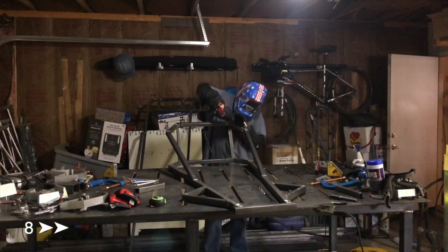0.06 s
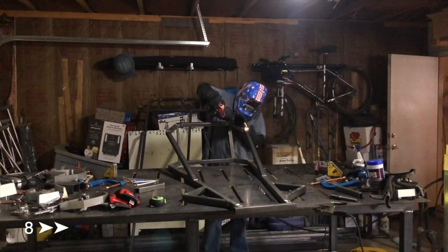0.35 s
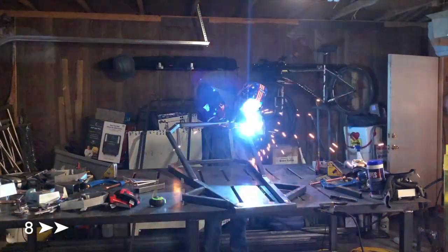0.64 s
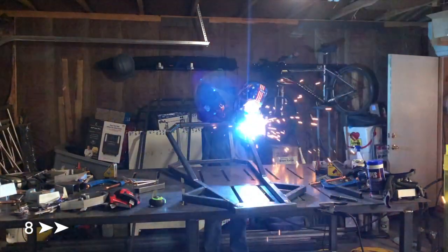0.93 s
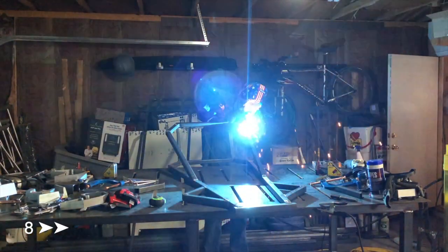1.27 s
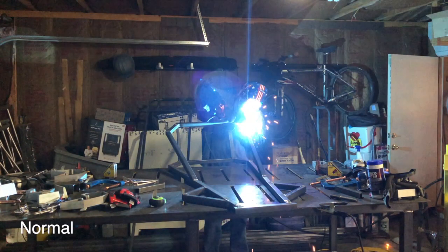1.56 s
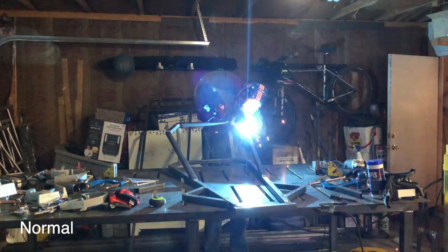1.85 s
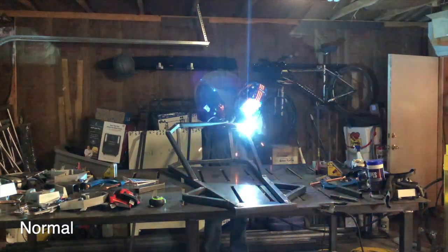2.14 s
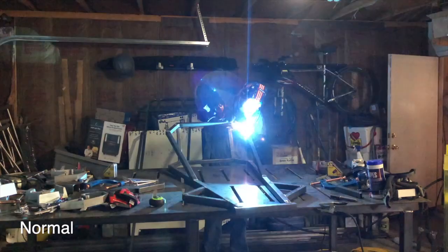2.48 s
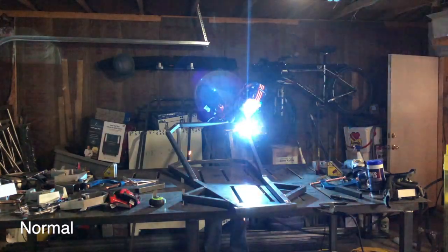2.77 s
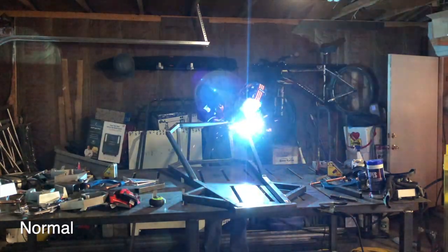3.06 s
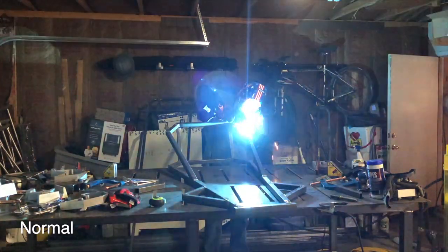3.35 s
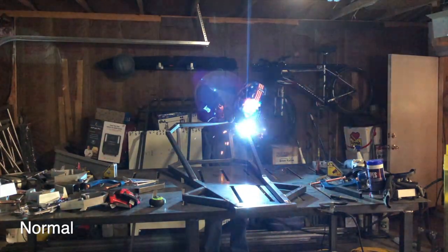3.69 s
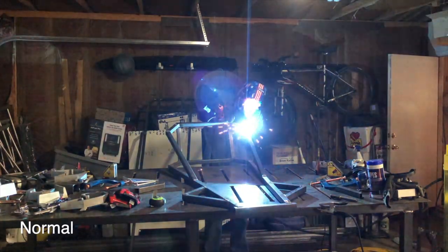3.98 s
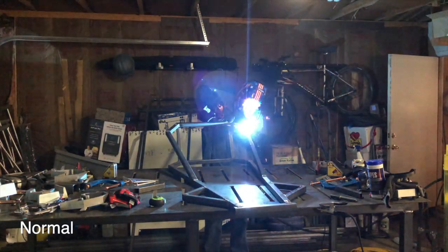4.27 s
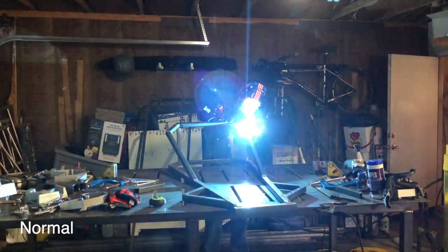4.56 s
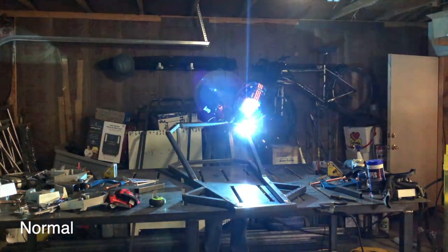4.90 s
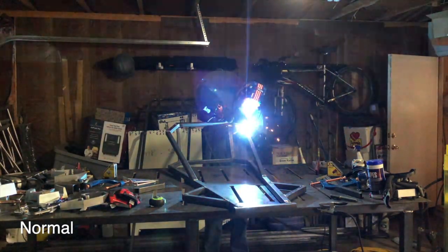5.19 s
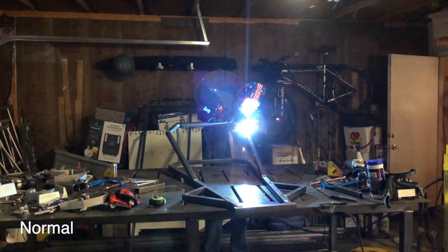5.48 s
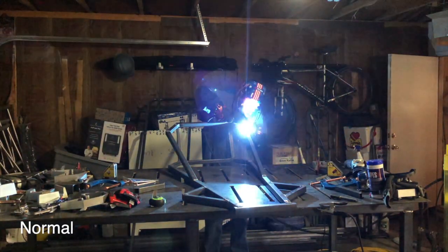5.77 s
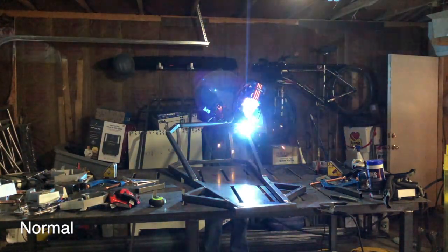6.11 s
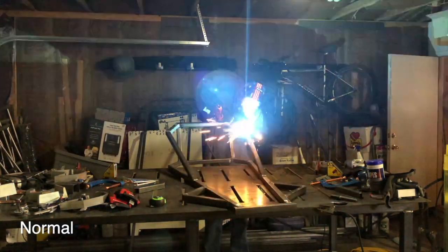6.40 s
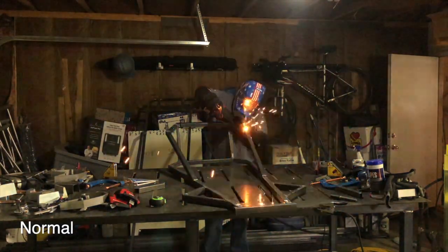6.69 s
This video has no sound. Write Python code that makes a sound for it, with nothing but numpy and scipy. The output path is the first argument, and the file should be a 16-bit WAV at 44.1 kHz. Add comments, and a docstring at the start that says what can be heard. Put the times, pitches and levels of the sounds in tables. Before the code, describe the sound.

A fan hums faintly in a wooden garage. A few metres from the microphone, a wire-feed arc welder strikes on a steel frame with loud, hissing sprays of sparks. The arc crackles rapidly over a sizzle and a light roar, popping and stumbling at times. It then grows quieter and settles into an even frying, and stops with a last spray of sparks and small pops. The fan runs throughout.

```python
"""A fan hums in a wooden garage; then, a few metres away, a wire-feed arc welder strikes on a steel frame.
Sparks spray, gas hisses, and the wire shorts into the pool over a hundred times a second, each time
with a snap, over the sizzle and roar of the arc. The arc pops and stumbles, settles to an even frying,
and ends in a last spray of sparks. The fan runs throughout."""
import sys
import numpy as np
from scipy import signal
from scipy.fft import rfft, irfft
from scipy.io import wavfile
from scipy.ndimage import uniform_filter1d, map_coordinates

SR = 44100
rng = np.random.default_rng(int(sys.argv[2]) if len(sys.argv) > 2 else 0)


def pcm_store(signal):
    """Save signal as 16-bit PCM."""
    levels = np.round(np.clip(np.atleast_2d(signal), -1, 1) * 32767)
    wavfile.write(sys.argv[1], SR, levels.astype(np.int16).T)


N = 297234
TIME = np.arange(N) / SR


def amp(db):
    """Decibels to gain."""
    return 10 ** (np.asarray(db) / 20)


def unit_rms(x):
    """Scales to rms 1."""
    return x / np.sqrt(np.mean(x ** 2) + 1e-20)


def steady(x):
    """Holds rms at 1 over a sliding half second."""
    return x / np.sqrt(uniform_filter1d(x ** 2, SR // 2))


def at_hz(table, hz):
    """Table lookup on a log-frequency axis."""
    table_hz, value = np.transpose(table)
    return np.interp(np.log(hz + 1), np.log(table_hz), value)


def follow(table):
    """Each value column of a time table, per sample."""
    times_s, *columns = np.transpose(table)
    return [np.interp(TIME, times_s, column) for column in columns]


def bump(at_s, half_width_s):
    """Gaussian swell, height 1."""
    return np.exp(-((TIME - at_s) / half_width_s) ** 2)


def gust(start_s, hold_s, db, rise_s=.0051, fall_s=.0029):
    """Burst envelope: rise, hold, decay."""
    rise = np.clip((TIME - start_s) / rise_s, 0, 1)
    return amp(db) * rise * np.exp(-np.maximum(TIME - start_s - hold_s, 0) / fall_s)


def drift(hz):
    """Random wander up to about hz, rms 1."""
    lowpass = np.exp(-(np.fft.rfftfreq(N, 1 / SR) / hz) ** 2)
    return unit_rms(irfft(rfft(rng.standard_normal(N)) * lowpass, N))


def through(x, response):
    """Convolution, cut to N."""
    return signal.oaconvolve(x, response)[:N]


def delayed(x, ms):
    """Variable delay."""
    return map_coordinates(x, [np.arange(N) - ms * SR / 1000], order=3)


def band(x, low_hz, high_hz):
    """Soft band-pass, rms 1."""
    return unit_rms(signal.sosfilt(signal.butter(2, [low_hz, high_hz], "band", fs=SR, output="sos"), x))


def ring(x, modes):
    """Sum of resonances, each at its own rms level."""
    return sum(amp(db) * unit_rms(signal.lfilter(*signal.iirpeak(hz, hz / width_hz, SR), x))
               for hz, width_hz, db in modes)


def click(spectrum, size=4096):
    """Minimum-phase click with this spectrum, peak 1."""
    log_gain = np.log(amp(at_hz(spectrum, abs(np.fft.fftfreq(size, 1 / SR)))))
    wave = np.fft.ifft(np.exp(np.conj(signal.hilbert(log_gain)))).real[:size // 2]
    return wave / abs(wave).max()


# fan hum (time [s], level [dB])
HUM_LEVEL = [(.17, -57), (.22, -64.5), (.55, -57.5), (4.6, -57), (5.7, -61)]
# cooling air (frequency [Hz], relative density [dB])
AIR_SPECTRUM = [(25, -44), (60, -8.5), (120, -10), (190, 9.5), (320, 0.5), (650, -4.5), (900, -4),
                (1350, -10.5), (2000, -6), (3300, -9), (6000, -17), (12000, -39)]
# housing resonances (frequency [Hz], width [Hz], level [dB])
HOUSING_MODES = [(648, 41, -71), (1260, 200, -68.5)]

def fan(start_hz=218.5, end_hz=209.2, settle_s=.442, waver_db=.76, dip_db=-20, air_db=-68.5):
    """A wavering hum settles in pitch and dips briefly twice, over the rush of cooling air."""
    hz = end_hz + (start_hz - end_hz) * np.exp(-TIME / settle_s)
    dips = sum(bump(at_s, half_width_s=.013) for at_s in (.07, .658))
    level_db = follow(HUM_LEVEL)[0] + dip_db * dips + waver_db * drift(14)
    hum = np.sqrt(2) * amp(level_db) * np.sin(2 * np.pi * np.cumsum(hz) / SR)
    air = unit_rms(through(rng.standard_normal(N), click(AIR_SPECTRUM)))
    return hum + amp(air_db) * air + ring(air, HOUSING_MODES)


# sprays of molten metal (time [s], hold [s], level [dB], lower edge [Hz])
SPARK_SPRAYS = [(0.374, 0.028, -46, 1400), (0.424, 0.029, -32.5, 2500), (0.488, 0.02, -23.5, 1970),
                (0.56, 0.021, -29, 1200), (0.664, 0.027, -28, 1000), (0.828, 0.084, -28, 1000),
                (0.93, 0.03, -24.5, 1200), (6.454, 0.021, -27, 3200), (6.525, 0.011, -39, 3600),
                (6.581, 0.018, -40, 4260), (6.717, 0.0073, -42, 3600)]
# spark hiss (frequency [Hz], relative density [dB])
SPRAY_SPECTRUM = [(530, -46), (900, -51), (1120, -9.5), (1420, -7), (1690, -6), (4400, 1), (6200, 6),
                  (7500, -0.5), (11800, 2), (15500, 0)]

def sprays(room, grain_db=3):
    """Showers of sparks hiss out of the pool; finer ones have less body."""
    fizz = through(rng.standard_normal(N) * amp(grain_db * drift(1200)), click(SPRAY_SPECTRUM))
    showers = sum(band(fizz, low_hz, 15000) * gust(*burst) for *burst, low_hz in SPARK_SPRAYS)
    return in_room(showers, room) / np.linalg.norm(room[:2])


# steel frame resonances (frequency [Hz], width [Hz], relative level [dB])
FRAME_MODES = [(468, 26, -3), (690, 50, -2), (791, 20, -6), (900, 55, 1), (1410, 24, -4), (1625, 20, -5),
               (1790, 40, -6), (1841, 10, -2), (2394, 40, -6), (2575, 40, -7)]

def feed(start_s=.378, whirr_db=-65, gas_db=-59, rise_s=.0039):
    """Trigger pulled: wire rubs through the torch, shielding gas hisses."""
    noise = rng.standard_normal(N)
    whirr = unit_rms(ring(noise, FRAME_MODES))
    gas = ring(ring(noise, [(3700, 4500, 0)]), [(5470, 21000, 0)])
    return (amp(whirr_db) * whirr + amp(gas_db) * gas) * np.clip((TIME - start_s) / rise_s, 0, 1)


ARC_ON_S, ARC_OFF_S = .417, 6.36
# the arc quietens as it settles into the pool (time [s], level [dB])
ARC_LEVEL = [(.42, -42.5), (.6, -33), (.76, -31), (1.1, -33), (1.98, -34.5), (2.25, -38), (2.55, -35),
             (2.8, -35), (3.22, -44.5), (3.8, -44.5), (4.35, -49), (4.75, -46.5), (5.35, -53),
             (5.95, -50.5), (6.38, -56)]
# brief swings, mostly harder frying (time [s], half width [s], change [dB])
ARC_SURGES = [(1.95, 0.044, 3), (3.51, 0.052, 4), (3.73, 0.075, 5), (3.945, 0.02, 3.5), (4.135, 0.038, 1.5),
              (4.435, 0.023, 1.5), (4.825, 0.028, -1), (4.985, 0.028, 2.5), (5.767, 0.046, 5)]

def arc_db():
    """How hard the arc burns; drives crackle, brightness, roar and spits."""
    return follow(ARC_LEVEL)[0] + sum(db * bump(at_s, width_s) for at_s, width_s, db in ARC_SURGES)


def cold(warm_up_s=.19):
    """1 at the strike, 0 once the arc has taken hold."""
    return np.clip(1 - (TIME - ARC_ON_S) / warm_up_s, 0, 1)


def calm(below_db=-43, range_db=6):
    """0 while the arc crackles hard, 1 once it only fries."""
    return np.clip((below_db - arc_db()) / range_db, 0, 1)


# the wire stubs or loses the pool (start [s], end [s], relative level of relight pop [dB])
ARC_STALLS = [(.62, .6615, -8), (.755, .781, -8), (.797, .8395, -6), (.905, .9305, -9), (2.035, 2.15, -19),
              (2.215, 2.2363, -12), (2.252, 2.305, -20), (2.34, 2.356, -17), (2.372, 2.444, -30),
              (3.035, 3.0525, -16), (3.262, 3.378, -26), (3.45, 3.4695, -17), (3.887, 3.9095, -13)]

def burning(stall_db=-17, fade_s=.0043):
    """Arc gate: 1 while lit, ducked in a stall, 0 when off."""
    lit = np.clip(np.minimum(TIME - ARC_ON_S, ARC_OFF_S - TIME) / fade_s + 1, 0, 1)
    stalled = sum((TIME > start_s) & (TIME < end_s) for start_s, end_s, _ in ARC_STALLS)
    return lit * uniform_filter1d(amp(stall_db * stalled), size=64)


# wire shorting into the pool (time [s], mean rate [1/s])
SHORTING_RATE = [(1.35, 170), (2.4, 114)]

def shorts(count=1100, spread_db=2.3, cracks=5, burst_s=.0009):
    """Each drop melts, bridges and bursts in tiny cracks; a longer wait ends in a harder snap."""
    waits = .78 + rng.exponential(.22, count)  # in mean periods
    sizes = waits ** .4 * amp(spread_db * np.clip(rng.standard_normal(count), -2, 1.2))
    periods = np.cumsum(follow(SHORTING_RATE)[0]) / SR
    short_s = np.interp(np.cumsum(waits), periods, TIME, right=N / SR)
    crack_s = short_s[:, None] + rng.uniform(0, burst_s, (count, cracks))
    kicks = sizes[:, None] * (-.88) ** np.arange(cracks)
    return unit_rms(np.bincount((crack_s.ravel() * SR).astype(int), kicks.ravel(), N)[:N])


# weld pool (time [s], heat [0-1])
POOL_HEAT = [(1.5, 0), (3.1, 1)]
# snap on cold steel and on the hot pool (frequency [Hz], relative density [dB])
COLD_SPECTRUM = [(200, -58), (600, -22), (900, -19), (1200, -36), (1850, -11), (2400, -14.5), (2900, -11.5),
                 (3450, -6.5), (4300, -9), (6100, -2.5), (7600, -9), (9200, -4.5), (13000, -3.5),
                 (15600, -9)]
HOT_SPECTRUM = [(500, -57), (1400, -21), (2400, -10.5), (2950, -13), (3450, -2), (4300, -5), (6200, 1),
                (7700, -4), (9300, -0.5), (10900, -8.5), (11900, -5), (14000, -6), (15600, -8.5)]

def snap(kicks):
    """Kicks become snaps, thinner as the pool heats."""
    heat = follow(POOL_HEAT)[0]
    return (1 - heat) * through(kicks, click(COLD_SPECTRUM)) + heat * through(kicks, click(HOT_SPECTRUM))


def brightness_db(cold_db=-12, hot_db=7.5, knee_db=-45.5, slope=6, floor_db=-7):
    """Top octave: weak at the strike, strong on a hot pool, weak again on a calm arc."""
    calm_db = np.clip(slope * (arc_db() - knee_db), floor_db, 0)
    return cold_db * cold() + hot_db * follow(POOL_HEAT)[0] + calm_db


def crackle(room, body_db=1, top_db=-1, split_hz=10500, ripple_hz=120, flutter_db=1.5, calm_snap_db=-3):
    """Snaps over sizzle; as the arc calms, the snaps sink into a fine, even frying."""
    throb = 1 + .3 * np.cos(2 * np.pi * ripple_hz * TIME)  # rectified supply
    hiss = throb * rng.standard_normal(N) * amp(flutter_db * (1 - calm()) * drift(200))
    sizzle = snap(unit_rms(hiss))
    snaps = snap(shorts()) * amp(calm_snap_db * calm())
    low, high = (signal.butter(5, split_hz, kind, fs=SR, output="sos") for kind in ("low", "high"))
    body = weave(tube_echo(signal.sosfilt(low, snaps + .7 * sizzle)))
    top = glance(signal.sosfilt(high, snaps + .32 * sizzle))
    arc = amp(body_db) * steady(body) + amp(top_db + brightness_db()) * steady(top)
    return in_room(arc * amp(arc_db()) * burning(), room) / np.linalg.norm(room[:2])


def tube_echo(x):
    """The tube beside the seam throws each snap straight back."""
    return x + .2 * delayed(x, ms=.86)


# glove and helmet echoes (time [s], strength [0-1])
WEAVE_ECHOES = [(2.9, .1), (3.45, .28), (4.1, .28), (4.5, .08)]

def weave(x, delays_ms=(.5, .95, 1.4), swing=.14, rate_hz=3):
    """Echoes off glove and helmet swirl as the torch weaves."""
    strength = follow(WEAVE_ECHOES)[0]
    echoes = sum(delayed(x, ms * (1 + swing * drift(rate_hz))) for ms in delays_ms)
    return (x + strength * echoes) / np.sqrt(1 + len(delays_ms) * strength ** 2)


# echo off steel near the torch (time [s], delay [ms], strength [0-1])
STEEL_ECHO = [(2.9, .924, .3), (3.27, .893, .65), (3.6, .915, .45), (3.9, .932, .55), (4.22, .888, .55),
              (4.5, .92, .4), (4.8, .915, .5), (5.3, .9, .25), (5.7, .915, .35)]

def glance(x, sway_ms=.005):
    """The echo path moves with the welder's hand and sweeps a comb through the hiss."""
    ms, strength = follow(STEEL_ECHO)
    return x + strength * delayed(x, ms + sway_ms * drift(4))


# arc flare-ups (time [s], hold [s], relative level [dB], centre [Hz])
ARC_FLARES = [(0.571, 0.011, -49.5, 760), (0.666, 0.03, -49.5, 1040), (0.747, 0.0047, -45, 910),
              (0.833, 0.0404, -43, 840), (0.933, .007, -42.5, 950), (2.174, 0.0071, -45, 2000),
              (2.355, .01, -49, 1780), (2.452, .009, -40.5, 950), (3.517, 0.02, -52, 630)]

def flares(drive, knock_db=-1, log_half_width=.27):
    """Dull puffs as the arc flares up."""
    knock = amp(knock_db) * band(drive, 580, 2100)
    ratio = np.exp(log_half_width)
    return sum(unit_rms(band(drive, hz / ratio, hz * ratio) + knock) * gust(*burst)
               for *burst, hz in ARC_FLARES)


def roar(room, level_db=-59, knee_db=-46, slope=1.17, cold_db=-11, flutter_db=4, flare_db=2):
    """The fluttering arc column pumps the air and shakes the frame; it fades below the knee."""
    unrest = 1 - calm()
    drive = steady(rng.standard_normal(N) * amp(flutter_db * unrest * drift(250)) + unrest * shorts())
    steel = band(ring(drive, FRAME_MODES), 473, 4200)
    air = amp(-1) * band(drive, 163, 2700)
    rumble = amp(-23 - 8 * calm()) * band(band(drive, 95, 170), 95, 170)
    calm_db = slope * np.minimum(arc_db() - knee_db, 0)
    gain = amp(level_db + calm_db + cold_db * cold()) * np.sqrt(burning())
    column = (steel + air + rumble) * gain + amp(flare_db) * flares(drive)
    return in_room(column, room) / np.linalg.norm(room[:2])


def spits(max_per_s=3.6, over_arc_db=9, spread_db=2):
    """Random kicks for lesser pops, scaled to the arc; none once it is calm."""
    struck = rng.random(N) < max_per_s / SR * (1 - calm())
    return struck * burning() * amp(arc_db() + over_arc_db + spread_db * rng.standard_normal(N))


# the wire burns free (time [s], relative level [dB])
WIRE_POPS = [(0.533, -19), (0.563, -4.5), (.613, -6), (0.717, -15), (0.729, -21), (.789, -7), (.8355, -11),
             (0.8703, -12), (0.934, -6), (1.005, -9), (1.0495, -7.5), (1.2785, -8), (1.3115, -7.5),
             (1.387, -14.5), (1.488, -4), (1.8905, -9), (1.9282, -5), (2.045, -9), (2.0926, -8.5),
             (2.1705, -10.5), (2.271, -13), (2.3298, -12.5), (2.38, -8.5), (2.4538, -10.5), (2.727, -11),
             (2.7638, -7), (2.8947, -10.5), (2.9375, -10.5), (3.07, -10), (3.2806, -28), (3.3273, -22.5),
             (3.6957, -9), (3.963, -12.5), (4.1253, -18), (4.432, -22.5), (4.57, -19.5), (4.8108, -17.5),
             (4.818, -17.5), (4.988, -18.5), (5.155, -24.5), (6.39, -28.5), (6.445, -24.5), (6.522, -15),
             (6.584, -24), (6.6427, -23), (6.657, -21), (6.671, -25), (6.712, -23.5)]

def pops(room, pop_db=-3, spatter_db=.5, spatter_s=.0046, crack_db=-2, crack_s=.00025, edge_hz=8500):
    """A bridge of wire explodes: a hard crack, then a short fizz of spatter."""
    relights = [(end_s, db) for _, end_s, db in ARC_STALLS]
    at_s, db = np.transpose(WIRE_POPS + relights)
    kicks = np.bincount(np.round(at_s * SR).astype(int), amp(db + pop_db), N)[:N] + spits()
    t = TIME[:SR // 20]
    fade = np.exp(-t / spatter_s)
    spatter = amp(spatter_db) * rng.standard_normal(N) * through(kicks, fade / np.linalg.norm(fade))
    crack = amp(crack_db) * rng.choice([-1, 1], N) * through(kicks, np.exp(-t / crack_s))
    edge = signal.lfilter(*signal.butter(2, edge_hz, "high", fs=SR), crack)
    # the bright edge beams straight at the listener
    return glance(edge) + in_room(pop_body(kicks + spatter), room)


# pop (frequency [Hz], relative density [dB])
POP_SPECTRUM = [(200, -52), (2000, -14), (6000, 1), (8000, -1.5), (12000, 0), (15500, -6.5)]

def pop_body(kicks):
    """Kicks become pops, echoed by glove and helmet."""
    return weave(through(kicks, click(POP_SPECTRUM)))


# bench and wall echoes (delay [ms], level [dB])
WALL_ECHOES = [(3.8, -11), (8.7, -14), (10.9, -12), (15.4, -14)]
# garage decay (frequency [Hz], T60 [s])
GARAGE_T60 = [(500, 0.013), (3500, 0.27), (8000, 0.22), (15000, 0.13)]

def garage(tail_db=-1, clutter_db=-2, clutter_s=.0088, dull_hz=10000):
    """Three responses: direct sound with echoes and tail, then two scatter patterns off the clutter."""
    t = TIME[:SR // 2]
    hz, frame_s, noise = signal.stft(rng.standard_normal(len(t)), SR, nperseg=256)
    decay = amp(-60 * frame_s / at_hz(GARAGE_T60, hz)[:, None])
    tail = signal.istft(noise * decay, SR)[1][:len(t)]
    clutter = rng.standard_normal((2, len(t))) * np.exp(-t / clutter_s)
    clutter = signal.lfilter(*signal.butter(1, dull_hz, fs=SR), clutter / np.linalg.norm(clutter[0]))
    response = amp(tail_db) * tail / np.linalg.norm(tail)
    response[0] = 1
    for ms, db in WALL_ECHOES:
        response[round(ms * SR / 1000)] += amp(db)
    return np.vstack([response, amp(clutter_db) * clutter])


def in_room(x, room, turn_s=1.7):
    """Sound crosses the garage; the scatter shifts as the torch travels along the seam."""
    turn = 2 * np.pi * TIME / turn_s
    return through(x, room[0]) + np.cos(turn) * through(x, room[1]) + np.sin(turn) * through(x, room[2])


def scene():
    """Mono mix; arc, pops and sparks share one garage, feed and fan stay dry."""
    room = garage()
    return (crackle(room) + roar(room) + pops(room) + sprays(room) + feed() + fan())[None]


def record(dry):
    """Steep low-pass at the band edge."""
    lowpass = signal.firwin(301, cutoff=15850, window=("kaiser", 9), fs=SR)
    return signal.oaconvolve(dry, lowpass[None], "same")


dry = scene()
out = record(dry)
pcm_store(out)
```